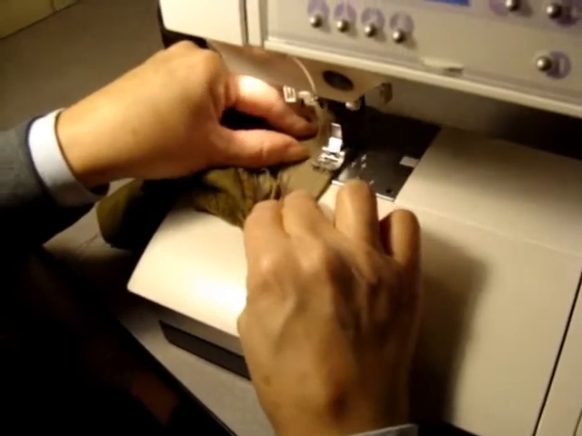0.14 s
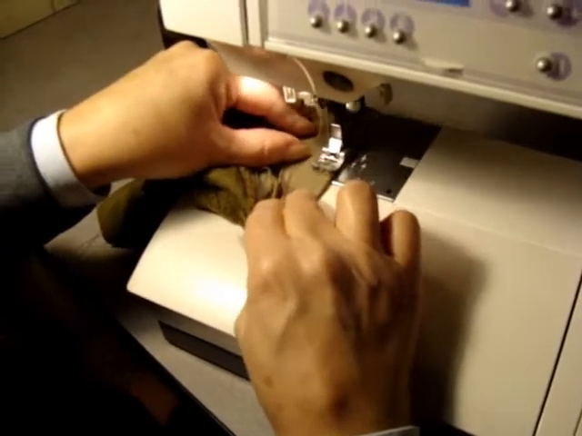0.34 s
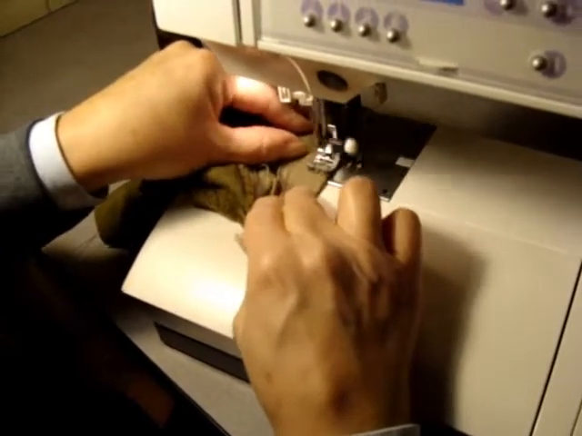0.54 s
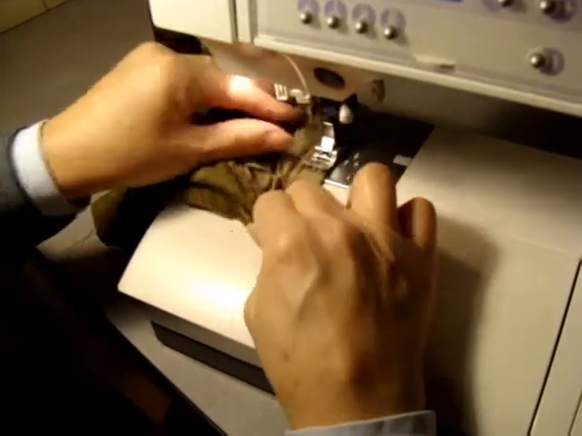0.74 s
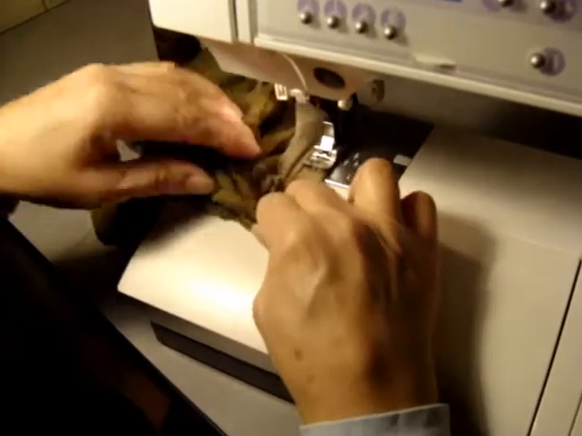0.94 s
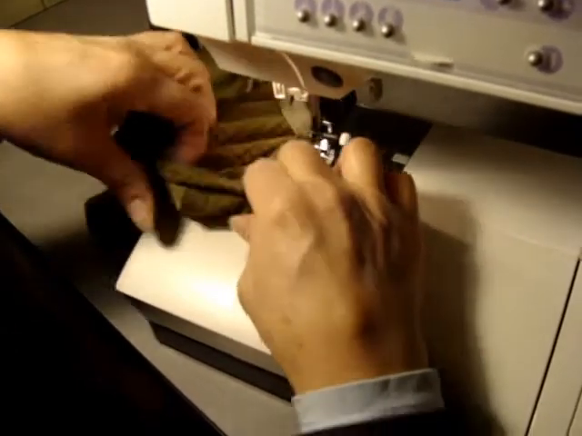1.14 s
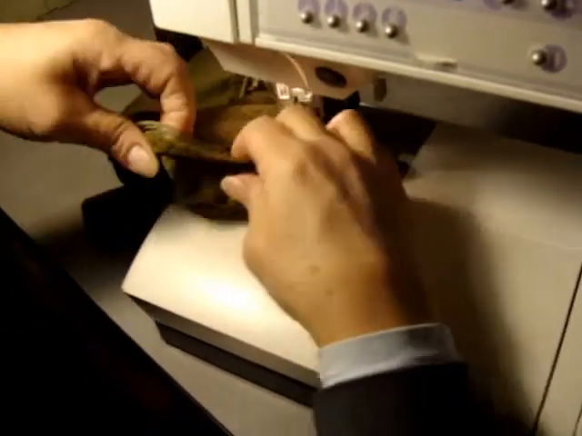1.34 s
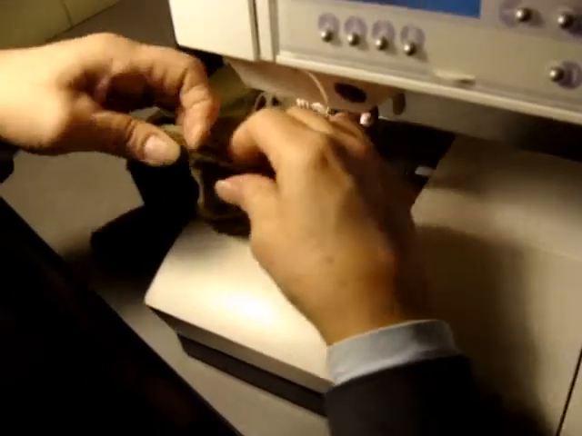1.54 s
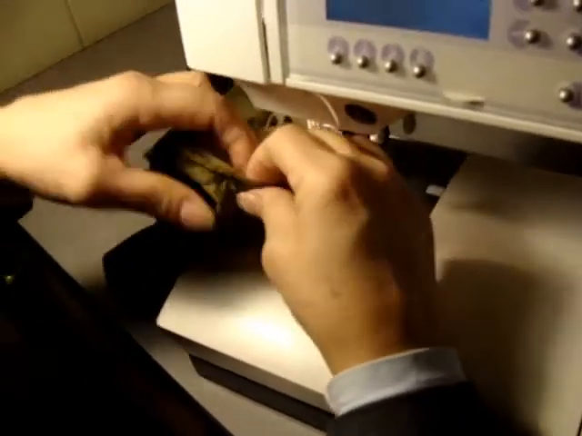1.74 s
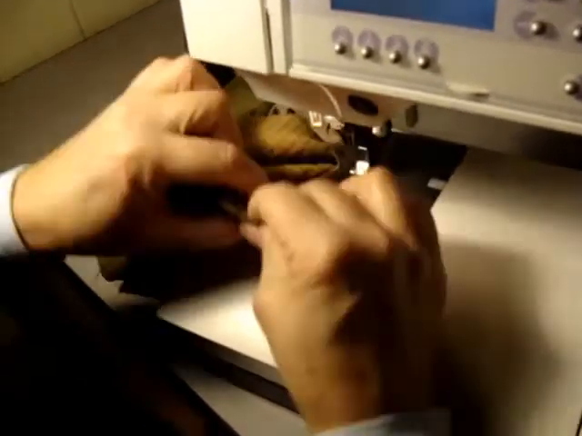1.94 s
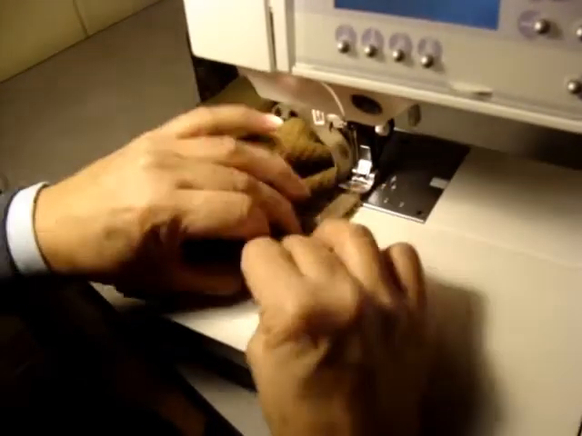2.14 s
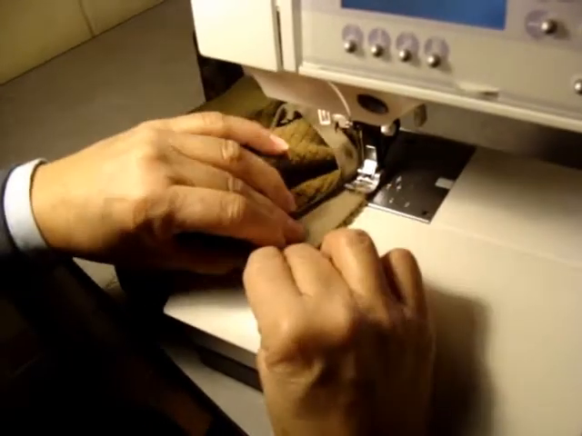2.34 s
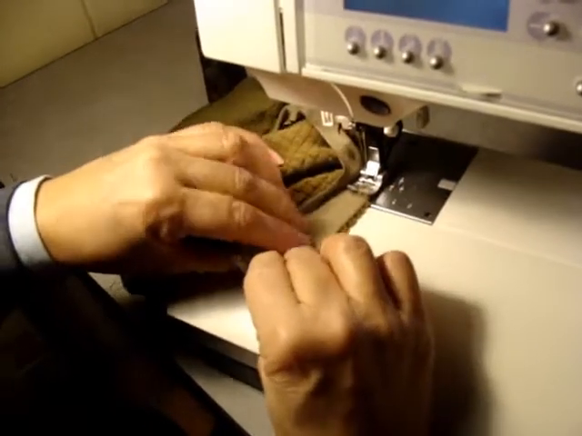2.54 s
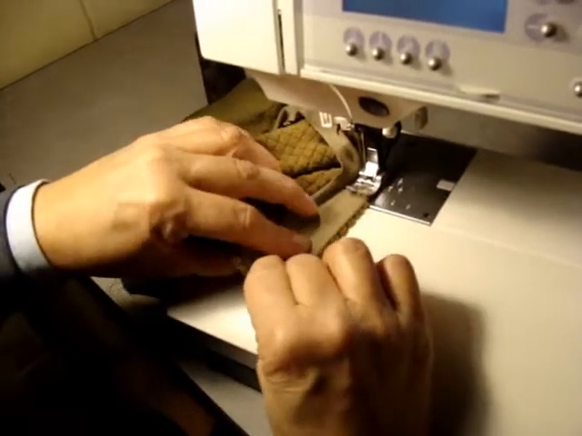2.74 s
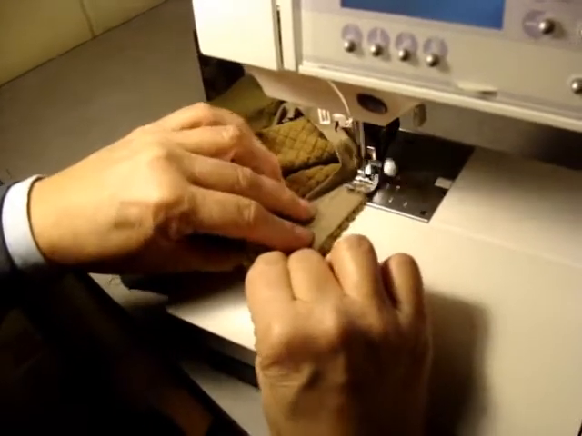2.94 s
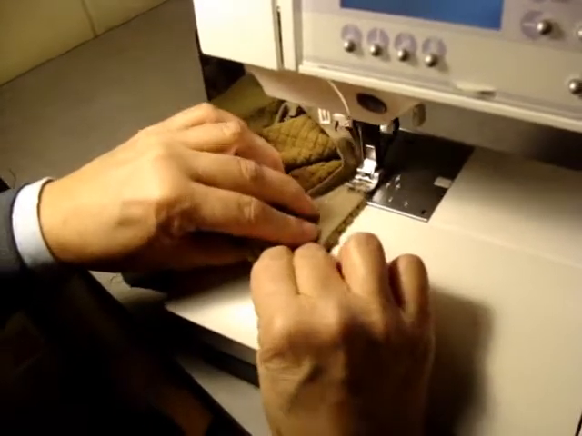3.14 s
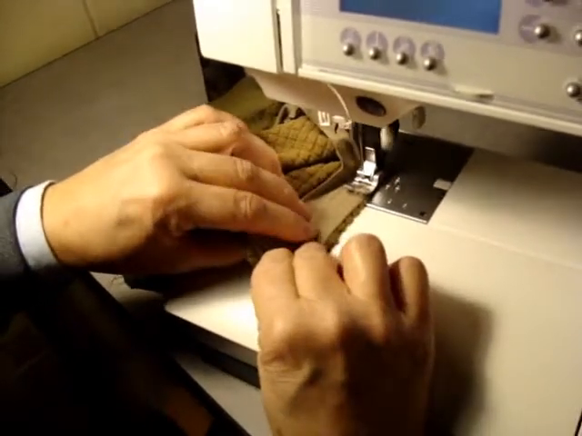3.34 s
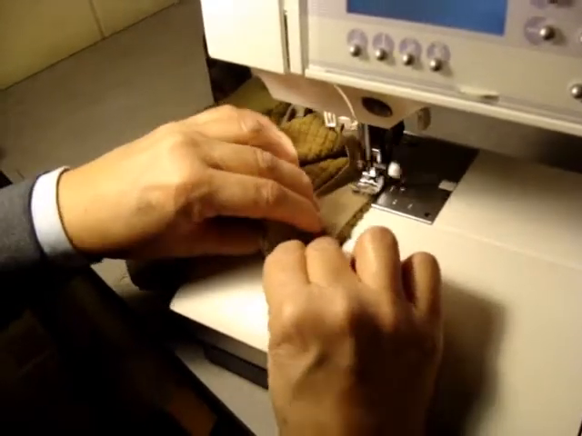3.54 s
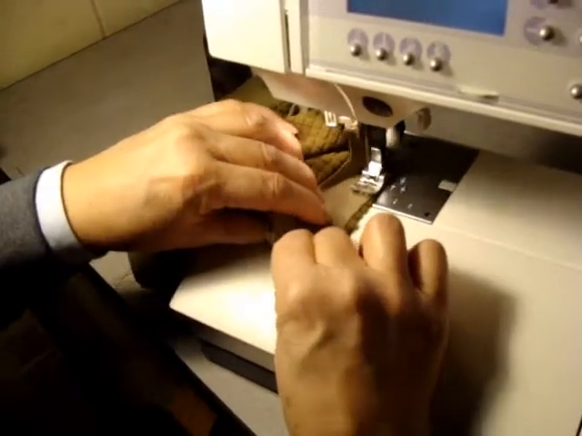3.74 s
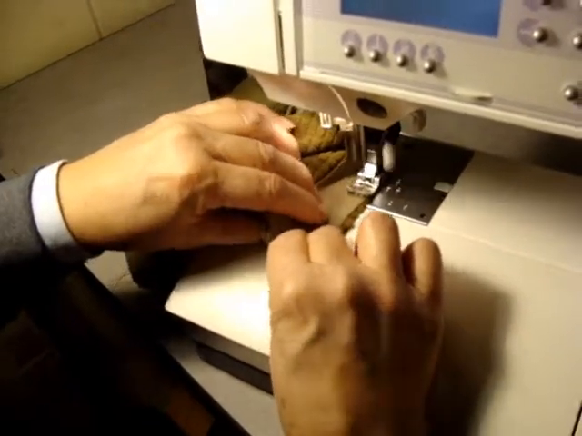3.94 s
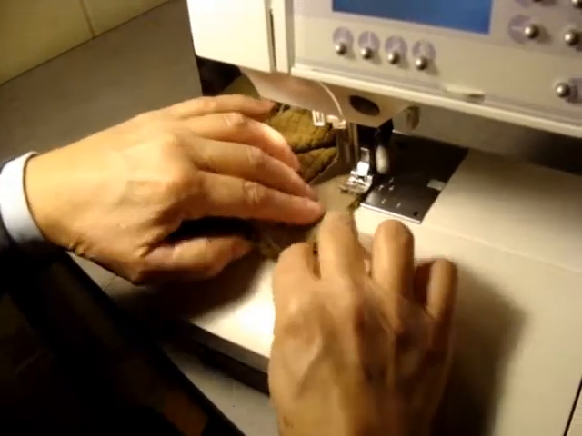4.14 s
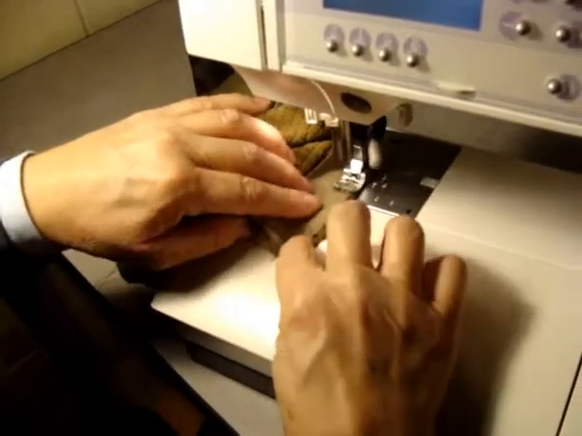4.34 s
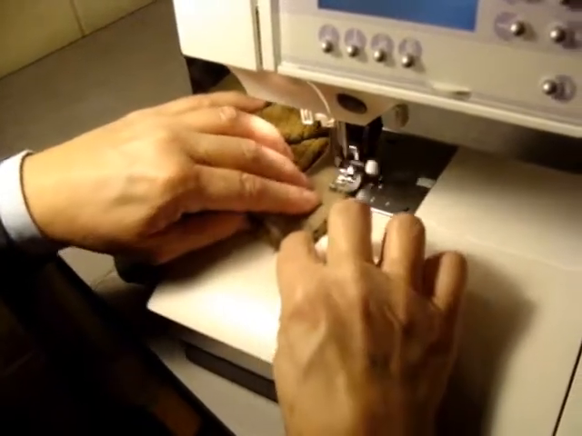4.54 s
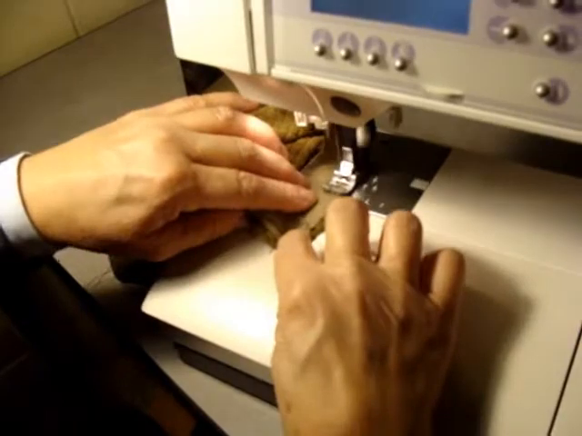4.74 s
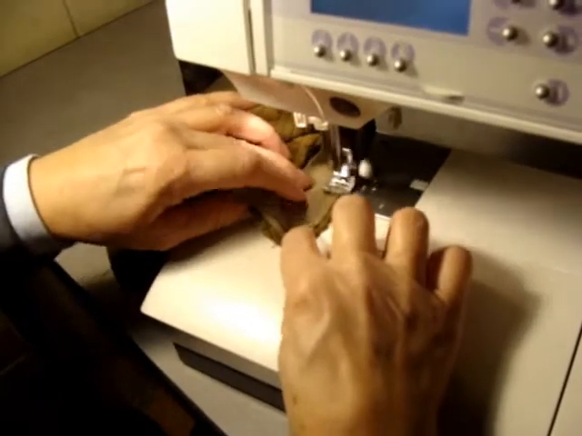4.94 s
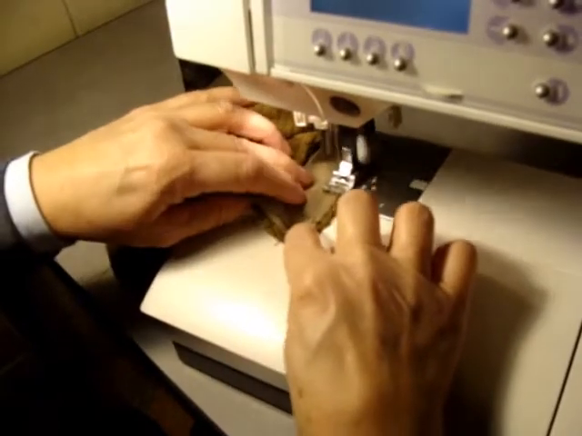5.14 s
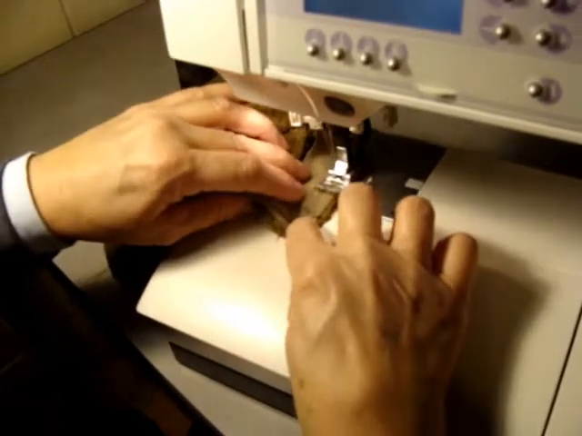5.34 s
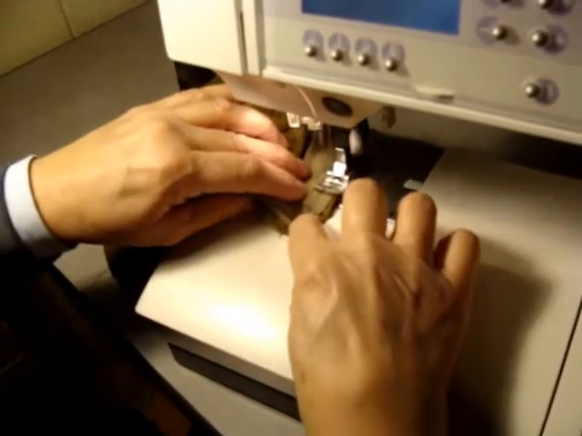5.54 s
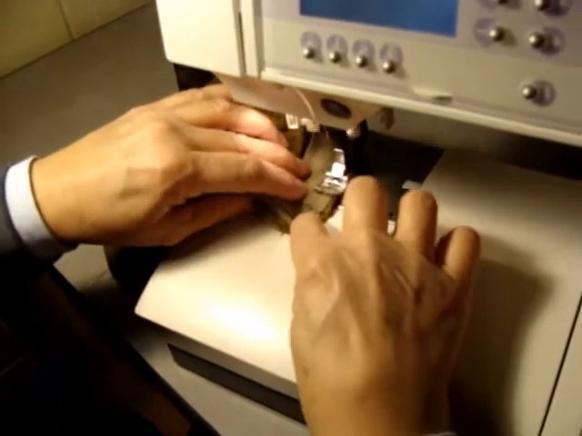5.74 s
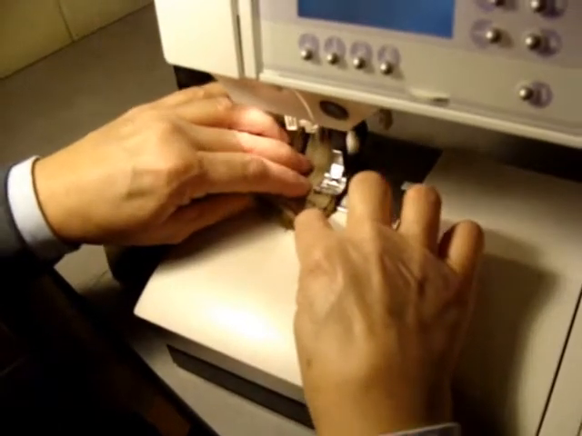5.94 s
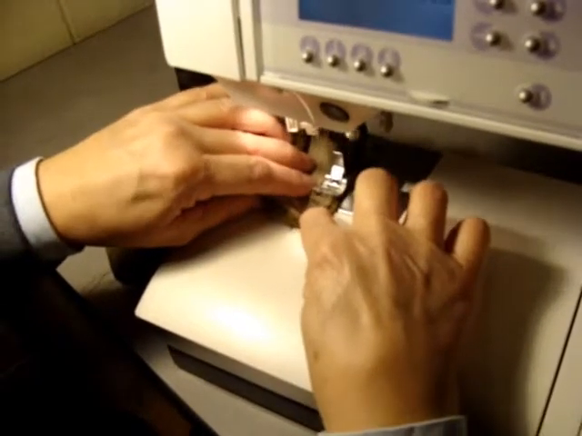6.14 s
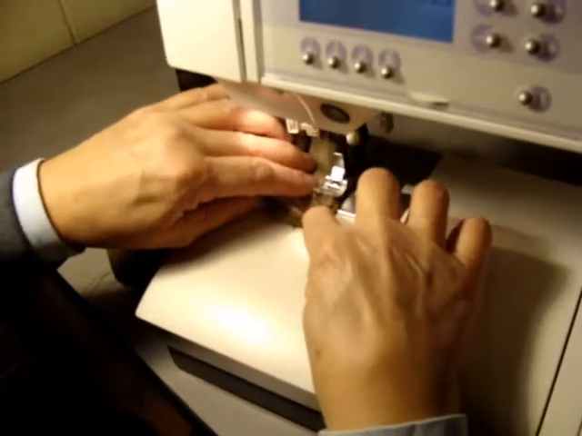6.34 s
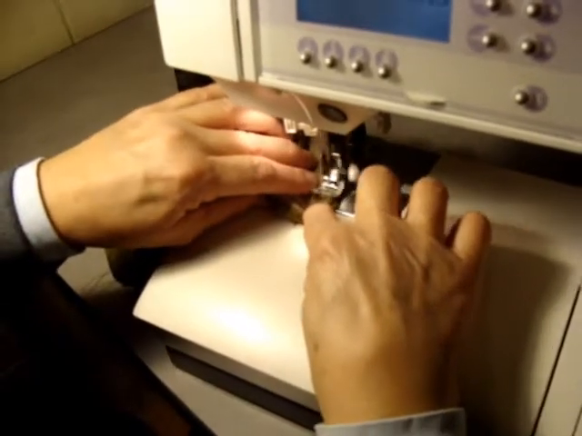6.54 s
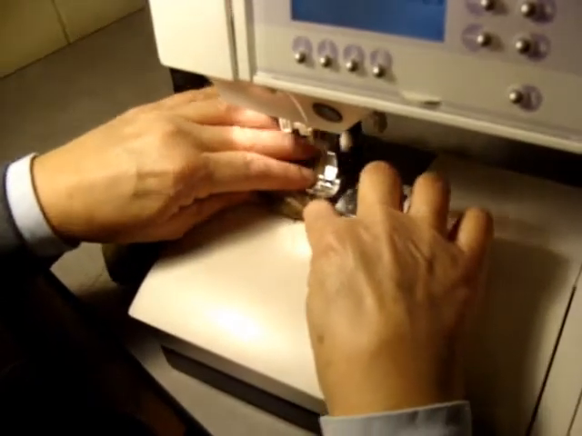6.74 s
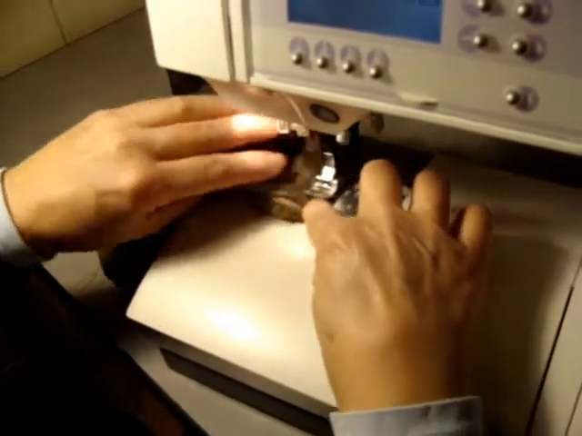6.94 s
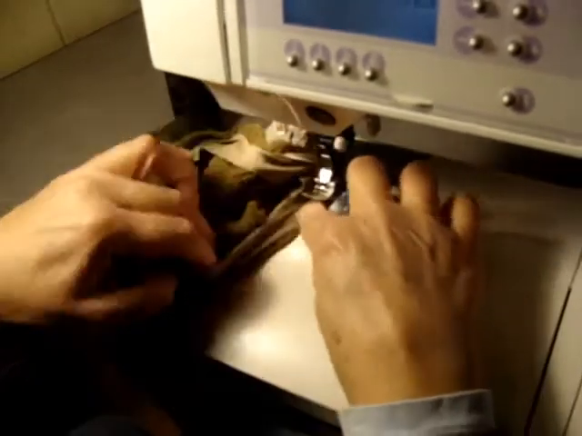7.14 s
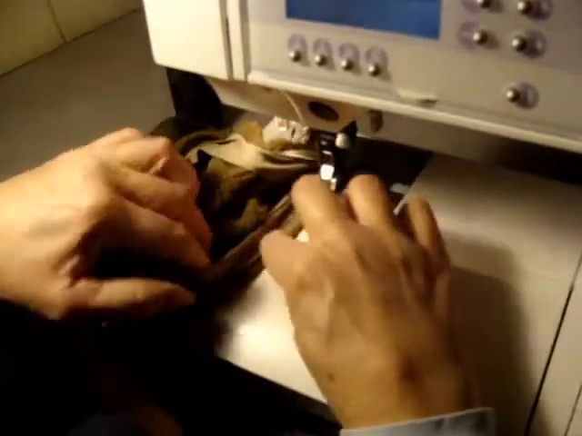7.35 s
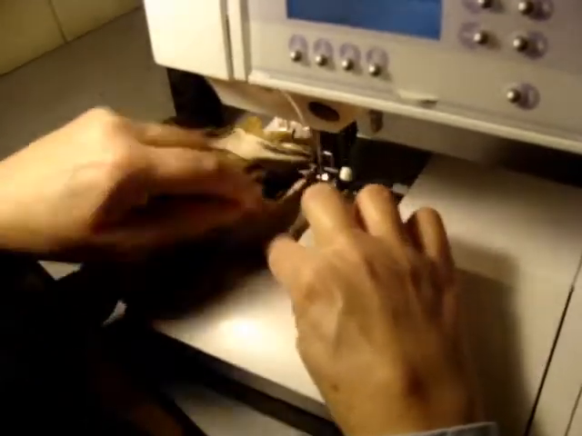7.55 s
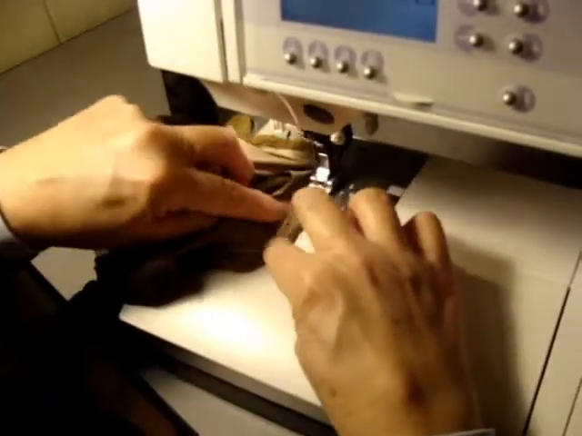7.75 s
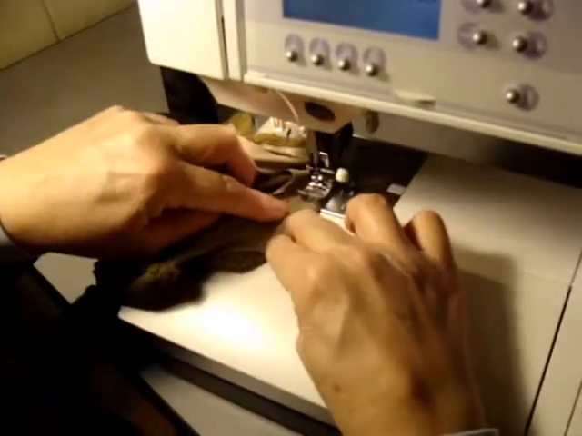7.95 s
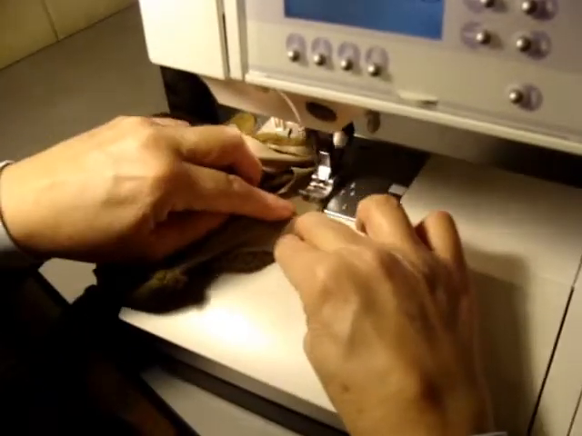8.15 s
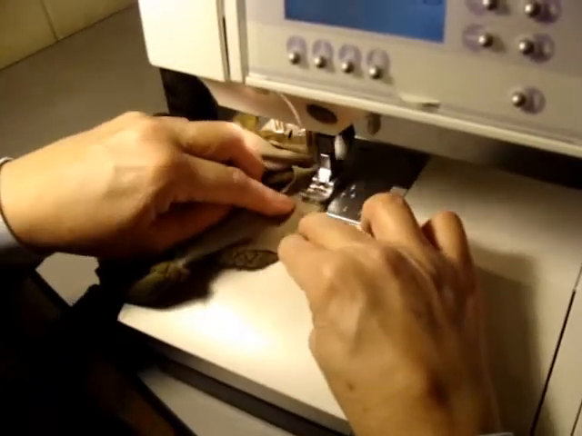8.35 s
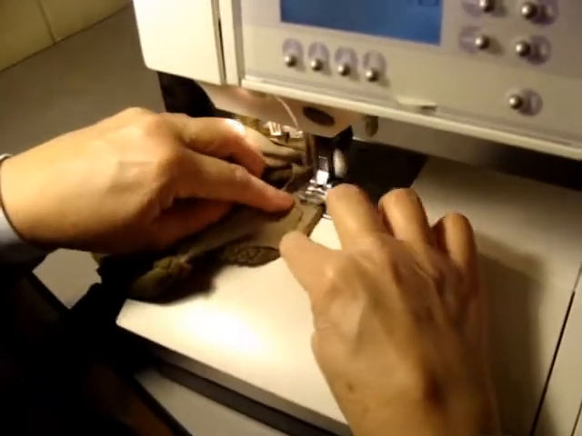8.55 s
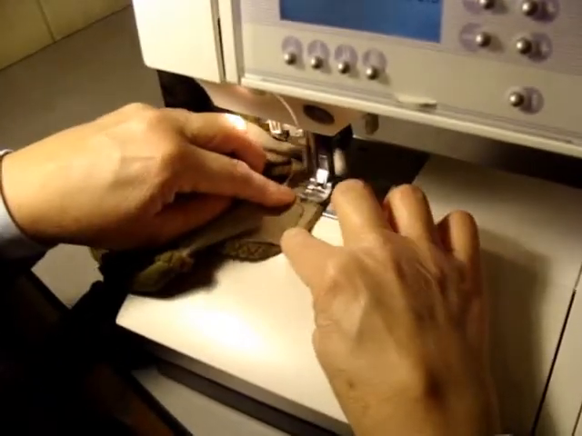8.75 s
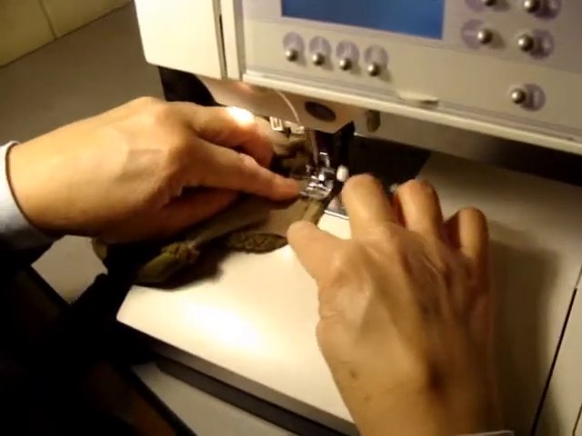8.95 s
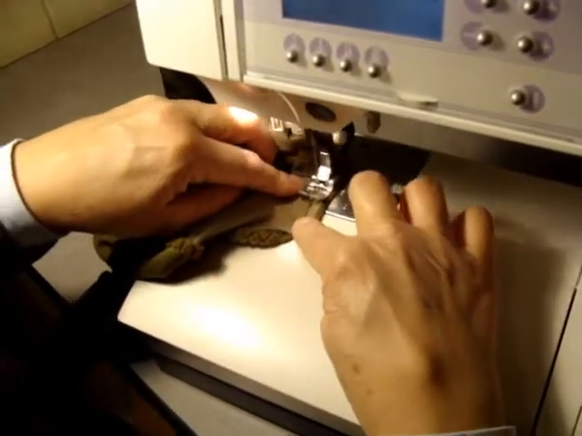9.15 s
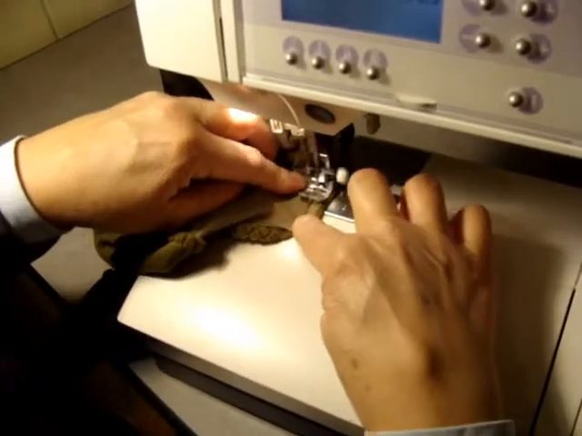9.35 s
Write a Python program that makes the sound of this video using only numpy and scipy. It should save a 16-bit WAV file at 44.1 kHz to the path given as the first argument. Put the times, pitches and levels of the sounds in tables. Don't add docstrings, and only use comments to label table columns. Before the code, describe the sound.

Close beside an electric sewing machine in a small quiet room. It is already sewing with a whining motor and regular metal clacks, then creeps to a stop amid ticks, cloth rustle and two dry snaps. After a quiet pause it runs a long fast seam, slows for more handling, and sews on to the end.

```python
import sys
import numpy as np
from scipy import signal
from scipy.fft import rfft, irfft
from scipy.io import wavfile
from scipy.ndimage import uniform_filter1d

SR = 44100
rng = np.random.default_rng(int(sys.argv[2]) if len(sys.argv) > 2 else 0)


def nominal_scale(level):
    x = np.asarray(level, float) / 20
    return 10 ** x


def output_pcm(signal):
    pcm = np.clip(np.atleast_2d(signal).T, -1, 1) * 32767
    wavfile.write(sys.argv[1], SR, np.round(pcm).astype(np.int16))


N = 414540


def rms_one(x):
    return x / np.sqrt(np.mean(x ** 2) + 1e-20)


def in_time(rows):
    s, *columns = np.transpose(rows)
    return [np.interp(np.arange(N) / SR, s, c) for c in columns]


def band(x, low_hz, high_hz):
    return signal.sosfilt(signal.butter(2, [low_hz, min(high_hz, .45 * SR)], "band", fs=SR, output="sos"), x)


def coloured(spectrum):
    hz, db = np.transpose(spectrum)
    grid = np.log(np.fft.rfftfreq(N, 1 / SR) + 1)
    gain = nominal_scale(np.interp(grid, np.log(hz), db))
    return rms_one(irfft(rfft(rng.standard_normal(N)) * gain, N))


def drift(rate_hz):
    r = np.exp(-2 * np.pi * rate_hz / SR)
    return rms_one(signal.lfilter([1], [1, -2 * r, r * r], rng.standard_normal(N + SR))[SR:])


def body(x, modes):
    out = 0
    for k, (hz, width_hz, db) in enumerate(modes):
        r = np.exp(-np.pi * abs(width_hz) / SR)
        feed = [(1 - r * r) / 2, 0, (r * r - 1) / 2]
        back = [1, -2 * r * np.cos(2 * np.pi * hz / SR), r * r]
        out = out + (-1) ** k * nominal_scale(db) * signal.lfilter(feed, back, x + 1e-18)
    return out


# (frequency [Hz], density [dB per Hz])
ROOM_TONE = [(15, -62), (25, -23), (44, -6.5), (86, -21.5), (126, 3), (170, -6), (208, -3.5), (230, -0.5),
             (345, -7), (7880, -26), (10400, -15.5), (13500, -74.5), (22000, -120)]


def hiss():
    return nominal_scale(-50.5) * coloured(ROOM_TONE)


# (first clack [s], turns [count], settled turn [s], time lost settling [s], settling [turns])
RUNS = [
    (0.1302, 5, .16, 0, 1),
    (3.1635, 33, .11525, .0278, 5.5),
    (8.3684, 9, .1245, .013, 2.2),
]
# (start [dB], middle [dB], end [dB])
RUN_DB = [(-11.5, -12, -13), (-9.5, -12.5, -10), (-8.5, -12, -13.5)]
# (time [s], peak [dB])
LONE_CLACKS = [
    (1.0172, -29),
    (1.8395, -27.5),
    (2.858, -13.5),
    (3.0269, -9.5),
    (7.0135, -15),
    (7.43, -20.5),
    (7.9849, -17.5),
    (8.2048, -11.5),
]


def shaft():
    rows = list(LONE_CLACKS)
    for (first, turns, turn_s, lost_s, settle), db in zip(RUNS, RUN_DB):
        k = np.arange(turns)
        force_db = np.polyval(np.polyfit([0, .5, 1], db, 2), k / (turns - 1))
        rows += zip(first + k * turn_s + lost_s * (1 - np.exp(-k / settle)), force_db)
    s, db = np.transpose(sorted(rows))
    s = np.concatenate([[2 * s[0] - s[1]], s, [2 * s[-1] - s[-2]]])
    t = np.arange(N) / SR
    turns = np.interp(t, s, np.arange(len(s)))
    per_s = np.interp(t, (s[1:] + s[:-1]) / 2, 1 / np.diff(s))
    return s, np.append(db[0], db), turns, per_s


# (time [s], motor slot rate [Hz], effort [dB])
PEDAL = [(0, 741, -35.5), (.85, 720.6, -39.5), (1.02, 254, -61), (1.8, 158.4, -62.5), (2.86, 610, -39.5),
         (2.97, 650, -39), (3.1, 850, -33.5), (3.16, 987, -32), (3.82, 1009, -37), (6.86, 1028, -38),
         (6.96, 960, -42), (7.11, 418, -55.5), (7.92, 229.7, -60), (8.12, 580, -42.5), (8.24, 637, -43.5),
         (8.36, 913, -36), (8.51, 932, -37.5), (9.4, 960.3, -38.5)]
# (time [s], mains buzz [dB], motor [dB])
POWERED = [
    (0, -8, -4.5),
    (1.87, -12.5, 5.5),
    (1.96, -36, -43),
    (2.845, -20, -52),
    (2.865, -10.5, -1),
    (9.4, -11.5, 2.5),
]
# (share of turn, speed change [%], whine [dB], whirr [dB])
LOAD = [(.08, -2, -5.5, 5.9), (.19, 0, 2, 3), (.3, 3.5, -3.5, 2.45), (0.469, 11, -2.5, 1.3),
        (.57, 2, -0.5, 0.7), (.66, 1.88, 1.5, 1.5), (0.762, -0.5, 1, 4), (.83, 1.3, -7.5, 2),
        (.96, 0, 5, 3.5)]
# (frequency [Hz], density [dB per Hz])
WHIRR = [(35, -55), (60, -43.5), (277, -12), (344, -23), (542, -6.5), (748, -7.5), (909, -2), (991, -1),
         (1770, -13.5), (3860, -13.5), (7690, -28.5), (9750, -23), (10400, -41), (13500, -86.5),
         (22000, -120)]
# (frequency [Hz], width [Hz], level [dB])
CASE = [(329, 62, -3.5), (609.7, 17, -0.5), (794, 61, -12.5), (990.2, 42.2, 7.5), (1015.2, 65, 4),
        (1147.5, 14, 0.5), (1342, 153, -11), (1490, 20, -20)]
# (frequency [Hz], width [Hz], level [dB])
COVERS = [(1990, 59, 0), (2590, 37, 4.5), (3887, 56, 0.5), (5840, 220, -7.5)]


def motor(turns):
    hz, effort_db = in_time(PEDAL)
    share, *columns = np.transpose(LOAD)
    round_turn = [np.interp(turns % 1, share, c, period=1) for c in columns]
    speed, whine_load_db, whirr_load_db = [uniform_filter1d(c, size=200) for c in round_turn]
    motor_db = effort_db + in_time(POWERED)[1]

    stumble = .25 * (1020 / hz) ** 4 * drift(30)
    sway_percent = speed * (1020 / np.maximum(hz, 700)) ** 1.8 + np.clip(stumble, -8, 8)
    slot = 2 * np.pi * np.cumsum(hz * (1 + sway_percent / 100)) / SR
    wobble = np.sin(2 * np.pi * 10 * turns + 1.03)
    overtone = nominal_scale(-22 + 4 * drift(40)) * np.sin(2 * slot)
    slow = np.log2(1020 / np.minimum(hz, 960))
    flutter_db = (.2 + 7 * np.minimum(slow, .5)) * drift(30) - 9 * slow
    tone = (np.sin(slot) * (1 + 0.76 * wobble) + overtone) * nominal_scale(whine_load_db + flutter_db)
    whine_db = 21 - 2 * np.log2(hz / 1000)
    whine = nominal_scale(whine_db) * (body(tone, CASE) + nominal_scale(-13.5) * tone)

    noise = coloured(WHIRR) * nominal_scale(whirr_load_db + 1.3 * wobble + 1.3 * drift(90))
    main_ring = nominal_scale(-6 * np.clip((hz - 800) / 150, 0, 1)) * body(noise, CASE[3:5])
    ring = nominal_scale(12.5) * (body(noise, CASE[:3] + CASE[5:]) - main_ring)
    covers = nominal_scale(8) * body(noise, COVERS)
    return nominal_scale(motor_db) * (whine + ring + covers + nominal_scale(4.0) * noise)


# multiples of twice the mains [count], and their rms [dB]
BUZZ_MULTIPLES = [1, 3, 4, 5, 6]
BUZZ_DB = [-59, -49, -45.5, -44, -51]
# (rms [dB], phase [rad])
SHAKE_MULTIPLES = [8, 15, 16, 23]
SHAKE = [(-69, 0.26), (-59, 0.83), (-56, 0.26), (-56, 0.46)]


def hum(turns, per_s, mains_hz=60):
    t = np.arange(N) / SR
    buzz, shake = np.zeros(N), np.zeros(N)
    for k, db in zip(BUZZ_MULTIPLES, BUZZ_DB):
        buzz += nominal_scale(db + 2.5 * drift(9)) * np.sin(4 * np.pi * mains_hz * k * t)
    for k, (db, phase) in zip(SHAKE_MULTIPLES, SHAKE):
        shake += nominal_scale(db) * np.sin(2 * np.pi * k * turns + phase)
    return np.sqrt(2) * (buzz * nominal_scale(in_time(POWERED)[0]) + shake * (per_s / 9.2) ** 2.5)


# (frequency [Hz], width [Hz], level [dB])
KNOCK = [(280, 17, -12.5), (336.2, 19.5, 3.5), (447, 29, -7), (579, 93, -0.5), (786, 140, -6),
         (1056, 73, -1.5), (1169, 32, 0.6)]
# (frequency [Hz], width [Hz], level [dB])
METAL = [(1840, 30, -31), (2093, 62, 9), (2553, 57, 5), (3075, 130, 7.5), (4410, 210, -15),
         (4520, 110, 5.5), (5230, 78, -5), (6210, 180, 4), (7360, 43, -13.5), (8850, 1920, 5)]


def ring_metal(x):
    return nominal_scale(0.5) * body(x, METAL) + nominal_scale(2.5) * x


def strikes(rows, bursts):
    drive, t = np.zeros((4, N + 2000)), np.arange(2000) / SR
    for (s, *db, rattle_s), burst in zip(rows, bursts):
        if s > 0:
            at, rattle_s = min(int(s * SR), N - 1), max(rattle_s, .0002)
            rattle = burst * np.exp(-t / rattle_s) * (1 - np.exp(-t / (0.27 * rattle_s)))
            push = 0.42 * np.exp(-t / 0.00026) + 0.48 * rattle
            drive[:, at:at + 2000] += nominal_scale(np.array(db))[:, None] * [push, rattle, rattle, push]
    thud, middle, bright, bump = drive[:, :N]
    case = nominal_scale(23.5) * body(thud, KNOCK) + nominal_scale(10.5) * band(thud, 250, 930)
    table = nominal_scale(26) * band(bump, 32, 290)
    metal = nominal_scale(6.0) * band(ring_metal(middle), 1160, 4840)
    sparkle = nominal_scale(4.5) * band(ring_metal(bright), 2860, 12000)
    return case + table + metal + sparkle


# (share of turn, case thud [dB], middle [dB], bright [dB], rattle [s])
CONTACTS = [(-.045, -39.5, -16.5, -13.5, 0.0022), (0, -11.5, -3, -0.2, 0.003),
            (.022, -8, -4, -11.5, 0.0032), (.09, -35, -10.5, -10, 0.0032), (.16, -24, -17.5, -22.5, 0.0031),
            (.3, -19, -15.5, -14.5, .0015), (0.461, -24.5, -24, -16, 0.0071), (.62, -26, -13.5, -21, .003),
            (.84, -35, -9, -14, 0.0025)]


def clacks(s, peak_db, creep_per_s=3, thud_db_per_octave=1.5):
    rows, bursts = [], []
    own = rng.standard_normal((len(CONTACTS), 2000))
    for before, start, end, db in zip([s[0]] + list(s), s, s[1:], peak_db):
        heavy_db = thud_db_per_octave * np.log2(0.33 / np.clip(start - before, .1, .3))
        gap_s, turn_s = end - start, min(end - start, .16)
        bright_more_db = 8 * np.log2(np.clip(turn_s, .11, .16) / 0.13)
        for (share, thud_db, middle_db, bright_db, rattle_s), rattle in zip(CONTACTS, own):
            slack_db, fresh = rng.normal(0, 1.6, 3), rng.standard_normal(2000)
            in_place = abs(share) < .1 or gap_s < 1 / creep_per_s
            if in_place and (share >= 0 or start - before < 1 / creep_per_s):
                levels = db + np.array([thud_db + heavy_db, middle_db, bright_db + bright_more_db]) + slack_db
                at_s = start + share * (turn_s if share < .1 else gap_s)
                rows.append((at_s, *levels, -90, rattle_s))
                bursts.append(0.77 * rattle + 0.58 * fresh)
    return strikes(rows, bursts)


# (time [s], peak [dB])
TOUCHES = [(1.0066, -23), (1.8325, -20.5), (2.8525, -20), (7.2884, -38), (7.4214, -16.5), (7.9833, -15)]
TICKS = [(1.0171, -14.5), (1.194, -31), (1.6773, -25.5), (1.8008, -22.5), (1.842, -12), (7.1305, -28),
         (7.3421, -20.5), (7.431, -16.5), (7.627, -27), (7.888, -21.5), (7.9626, -19.5), (8.004, -17.5),
         (8.172, -19.5)]
TAPS = [(1.263, -25), (1.3084, -28), (1.358, -29.5), (2.2084, -25.5), (2.372, -11.5), (2.586, -29),
        (2.7822, -36), (7.1869, -27.5), (7.4066, -25), (7.5156, -24.5), (7.846, -20)]
PATS = [(1.11, -47), (1.6112, -33), (1.933, -35.5), (2.159, -44), (2.2257, -38), (2.343, -41),
        (2.451, -36.5), (2.4945, -40), (2.7604, -38), (7.045, -23), (7.3695, -24.5), (7.4856, -36),
        (7.599, -45), (7.658, -31), (8.098, -33)]
THUMPS = [(1.1792, -28), (1.276, -25.5), (2.3945, -29.5), (7.3102, -26), (7.444, -29), (8.049, -14.5)]
# (thud over peak [dB], bright over peak [dB], ring [Hz], rattle [s])
KINDS = [
    (-7, -20, 4800, 0.0064),
    (-10.5, 0, 3600, 0.0031),
    (-9, -5, 1770, 0.0043),
    (-1.5, -28, 2200, 0.0027),
    (-1.5, -6, 1440, 0.0037),
]
# (time [s], peak [dB])
BUMPS = [(1.43, -52), (1.761, -27.5), (2.858, -41), (3.027, -33), (3.159, -47), (3.283, -41), (7.309, -46),
         (7.431, -47), (7.985, -42), (8.204, -36), (8.367, -43), (8.496, -32)]


def small(ring_s=.003, ring_db=-4.5, pitch_spread=.06):
    rows, rings, t = [], np.zeros(N + 2000), np.arange(2000) / SR
    for table, (thud_db, bright_db, hz, rattle_s) in zip([TOUCHES, TICKS, TAPS, PATS, THUMPS], KINDS):
        for s, db in table:
            rows.append((s, db + thud_db + 1.0, db - 5.5, db + bright_db - 4.0, -90, rattle_s))
            own_hz, at = hz * rng.normal(1, pitch_spread), int(s * SR)
            rings[at:at + 2000] += nominal_scale(db + ring_db) * np.sin(2 * np.pi * own_hz * t) * np.exp(-t / ring_s)
    rows += [(s, -90, -90, -90, db, .002) for s, db in BUMPS]
    bursts = rng.standard_normal((len(rows), 2000))
    return strikes(rows, bursts) + rings[:N]


# (from [s], to [s], level [dB])
HANDLING = [(1.056, 1.444, -56.5), (1.55, 1.9, -64), (2.753, 2.827, -53.5), (7.037, 7.55, -54),
            (7.758, 8.004, -51.5)]


def cloth(lumpy_db=6.0):
    t, move = np.arange(N) / SR, np.zeros(N)
    for start, end, db in HANDLING:
        move += nominal_scale(db) * np.sin(np.pi * np.clip((t - start) / (end - start), 0, 1)) ** .5
    return move * nominal_scale(lumpy_db * drift(16.5)) * rms_one(band(rng.standard_normal(N), 250, 4700))


# (time [s], peak [dB], rebound [s])
SNAPS = [(1.4293, -13.5, 0.00051), (1.7623, -5, .0009)]


def snaps(spike_s=.00006, rebound=0.39):
    out, t = np.zeros(N), np.arange(2000) / SR
    for s, db, back_s in SNAPS:
        spike = (1 + rebound) * np.exp(-t / spike_s)
        back = rebound * np.exp(-t / back_s) * (1 + 0.75 * rng.standard_normal(2000))
        out[int(s * SR):int(s * SR) + 2000] += nominal_scale(db) * (spike - back)
    return band(out, 250, 6700)


def room(x, t60_s, wet_db):
    t = np.arange(int(.4 * SR)) / SR
    tail = band(rng.standard_normal(len(t)), 120, 5700) * nominal_scale(-60 * t / t60_s) * (t > .006)
    return x + nominal_scale(wet_db) * signal.fftconvolve(x, tail / np.sqrt(np.sum(tail ** 2)))[:N]


def scene():
    s, peak_db, turns, per_s = shaft()
    machine = room(clacks(s, peak_db), t60_s=0.022, wet_db=-21.0)
    hands = room(small() + cloth() + snaps(), t60_s=0.13, wet_db=-21.5)
    return (hiss() + motor(turns) + hum(turns, per_s) + machine + hands)[None]


def starve(x, depth_db=21.0, slope_db=3.5, after_db=13.0):
    _, _, z = signal.stft(x, SR, "cosine", nperseg=256, noverlap=128)
    power = np.abs(z) ** 2 + 1e-20
    blocks = power.shape[1] // 8 * 8
    level = 10 * np.log10(power[:120, :blocks].reshape(20, 6, -1).mean(axis=1))
    click = level[2:10].max(axis=0).reshape(-1, 8).max(axis=1)
    click = np.maximum(click, np.roll(click, 1) - after_db)
    octaves = np.log2((np.arange(20) + .5) / 6)[:, None]
    floor_db = np.repeat(click, 8) - depth_db + slope_db * octaves
    keep = uniform_filter1d(level, size=3, axis=1) > floor_db
    keep[0] = True
    z[:120, :blocks] *= np.repeat(keep, 6, axis=0)
    return signal.istft(z, SR, "cosine", nperseg=256, noverlap=128)[1][:N]


def band_limit(x):
    return signal.sosfilt(signal.butter(12, 10550, fs=SR, output="sos"), x)


def record(dry):
    rounded = 0.6 * np.tanh(dry[0] / 0.66)
    top_cut = signal.cheby2(12, 70, 11085 * 1.003, fs=SR, output="sos")
    mix = signal.sosfilt(top_cut, starve(rounded)[None])
    return band_limit(mix)


dry = scene()
out = record(dry)
output_pcm(out)
```